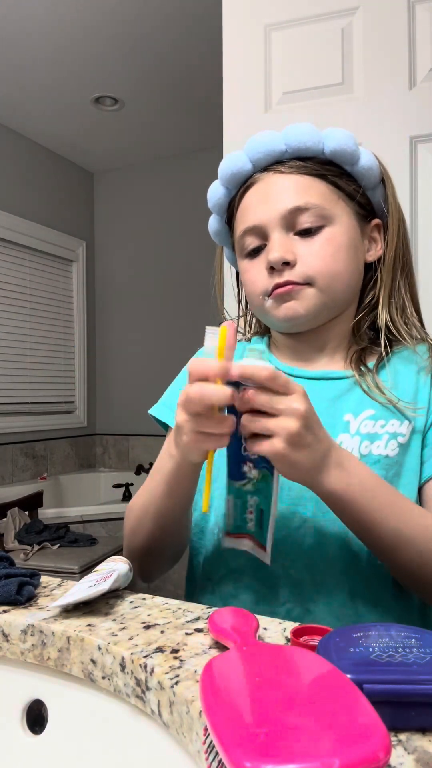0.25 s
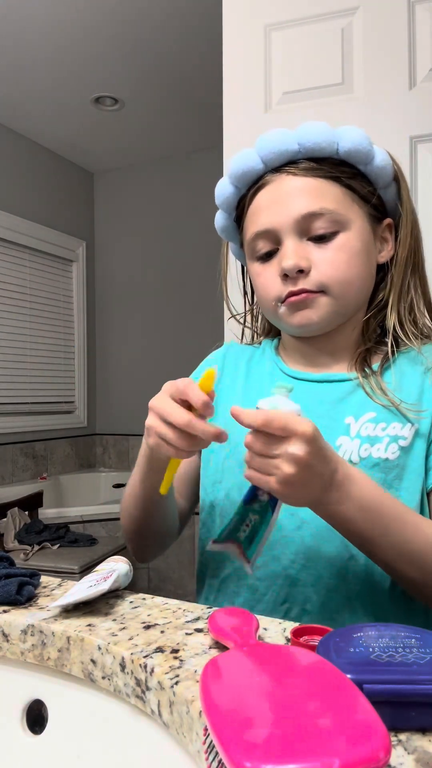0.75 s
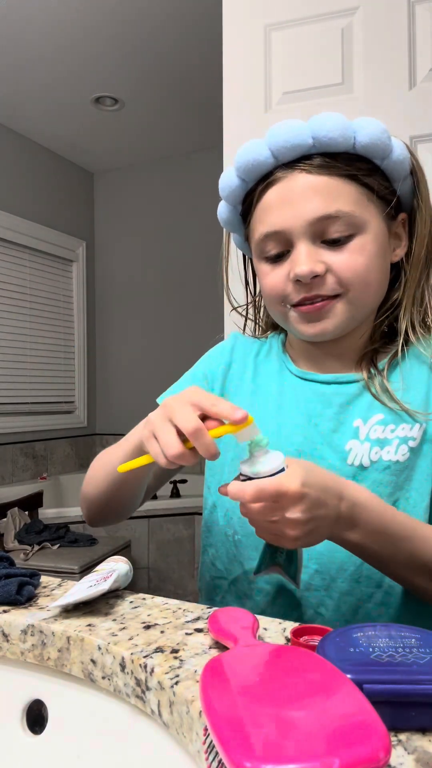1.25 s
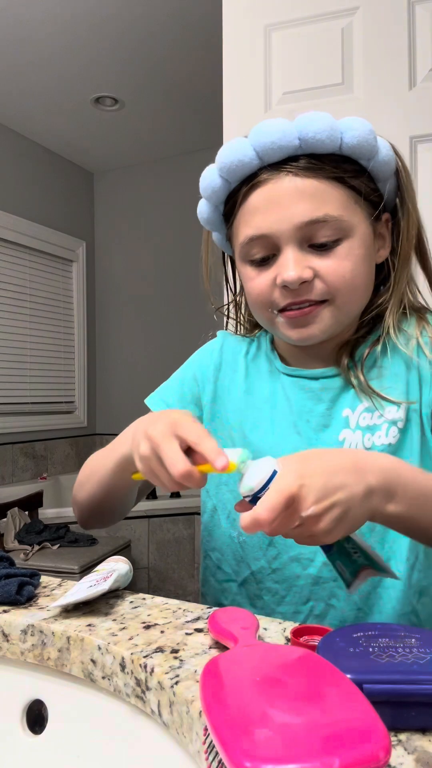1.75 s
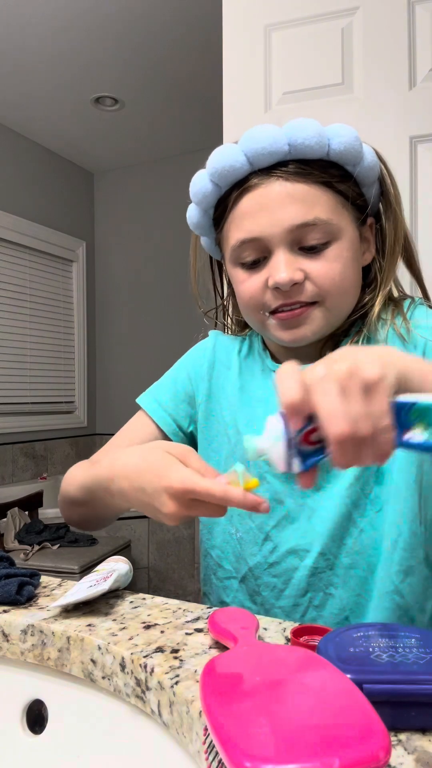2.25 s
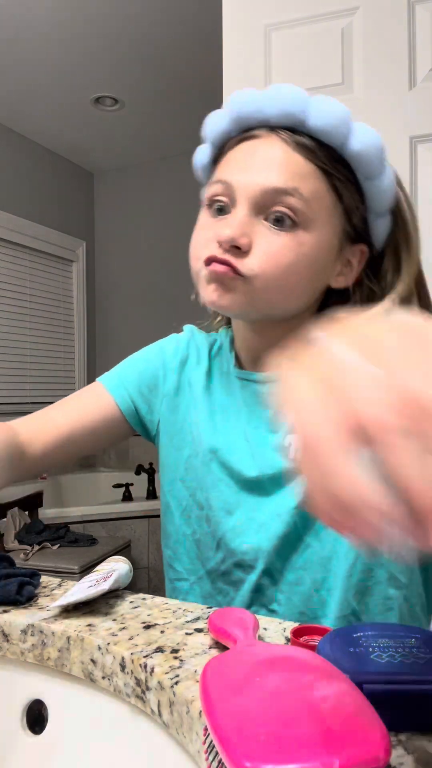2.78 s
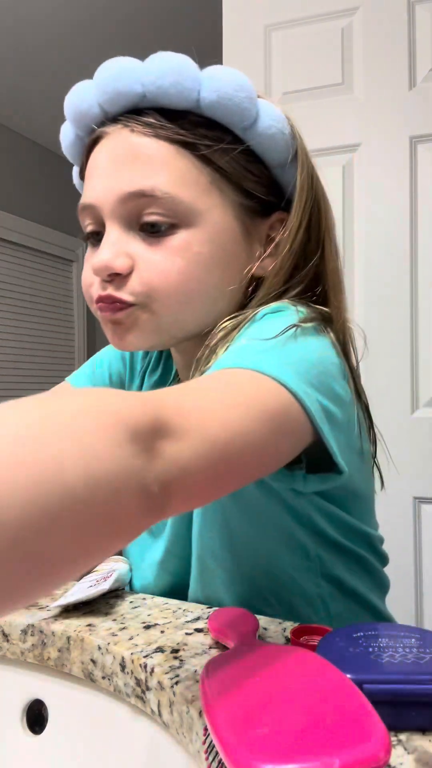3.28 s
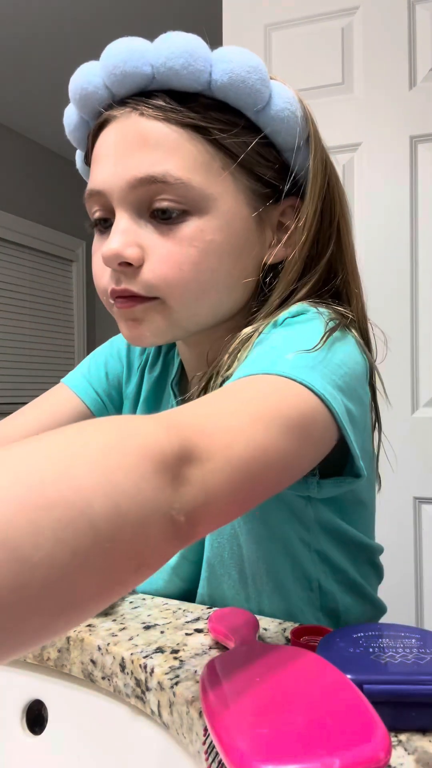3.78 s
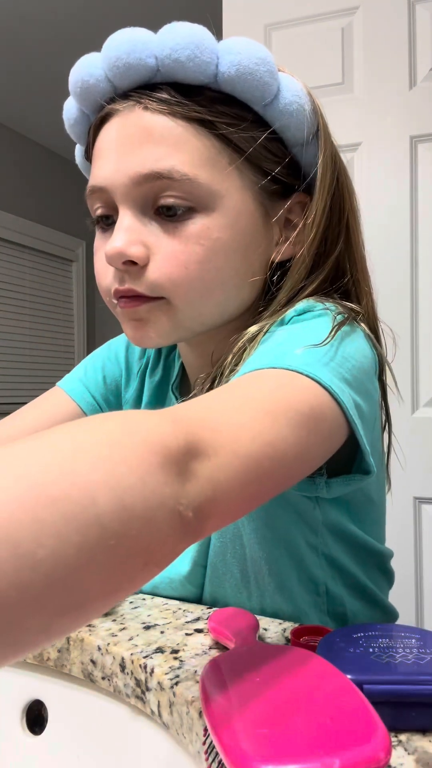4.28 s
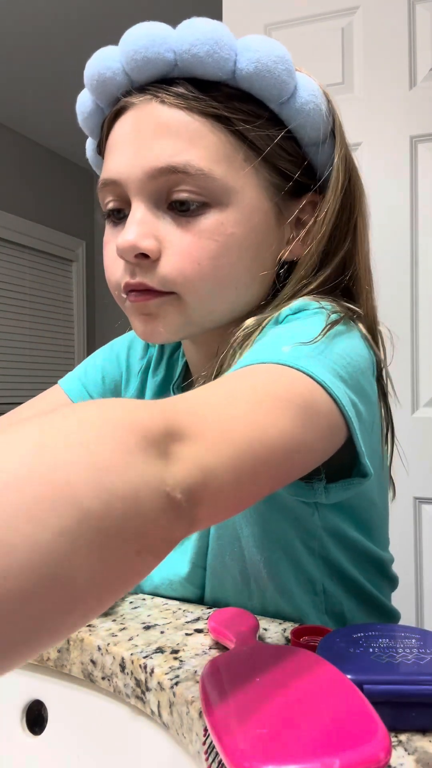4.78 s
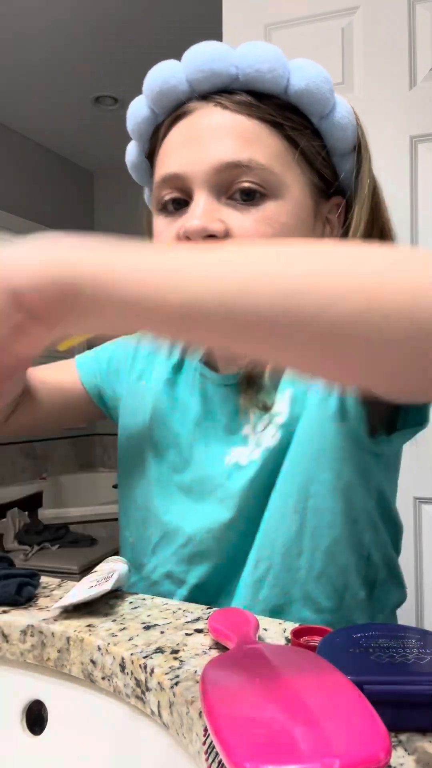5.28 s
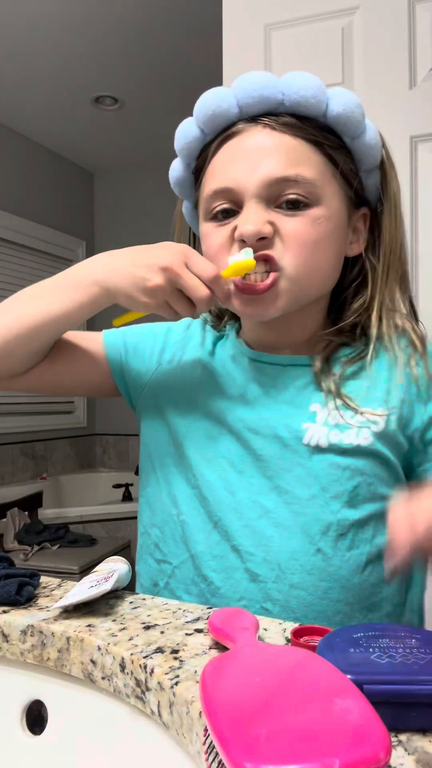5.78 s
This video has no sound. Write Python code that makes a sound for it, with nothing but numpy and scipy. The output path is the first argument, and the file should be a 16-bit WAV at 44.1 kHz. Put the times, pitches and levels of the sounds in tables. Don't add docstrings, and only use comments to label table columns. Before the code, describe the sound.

Faint rustles and ticks of a toothpaste tube, a sharp rattle on the counter, a second of spraying tap water, drips, toothbrush bristles.

```python
import sys
import numpy as np
from scipy import signal
from scipy.fft import rfft, irfft, next_fast_len
from scipy.io import wavfile

SR = 44100
rng = np.random.default_rng(int(sys.argv[2]) if len(sys.argv) > 2 else 0)


def master_out(mix):
    frames = np.transpose(np.atleast_2d(mix))
    ceiling = np.clip(frames, -1, 1)
    pcm = np.round(ceiling * 32767).astype(np.int16)
    wavfile.write(sys.argv[1], SR, pcm)


def linear_from_db(decibels):
    return 10 ** (np.asarray(decibels, float) / 20)


N = 265923

# pitch_hz, density_db_per_hz
AIR_COLOUR = [(21, -24.5), (35, 4), (109, -10), (168, -15), (204, -7), (263, -17), (284, -14), (362, -7),
              (540, -32.5), (700, -61), (1190, -120)]
# pitch_hz, width_hz, level_db
HUM_LINES = [(52.02, 11, -7.5), (120, 8, -11.5), (203.4, 5.4, -13.5), (309, 55, -12), (360.5, 1.6, -8.5),
             (480, 14, -20.5)]
# pitch_hz, density_db_per_hz
HISS_COLOUR = [(320, -38.5), (540, -3), (603, -4), (818, -8.5), (1190, -10), (2340, -20), (4500, -26.5),
               (8740, -32), (10200, -28), (13400, -30.5), (14500, -23)]
# pitch_hz, likeness (1 = same)
AIR_LIKENESS = [(60, .7), (200, .55), (350, .85), (1100, .2), (3000, .35), (6500, .65), (8000, .97),
                (9300, .45), (12000, .88), (14000, .55)]
# peak_s, added_db, rise_s, fall_s
SHAKES = [
    (2.62, 15.5, .14, .39),
    (4.05, -1.5, 0.46, 0.081),
]
# peak_s, added_db, rise_s, fall_s
STIRS = [
    (0.5, 6, 0.76, 0.98),
    (2.5, 19.5, 0.17, 1),
    (3.86, 7.5, 0.7, 0.2),
]

# start_s, hold_s, level_db
STROKES = [(0.0, 0.046, -73), (0.31, 0.061, -62), (0.375, .01, -68), (0.41, 0.055, -65),
           (0.63, 0.066, -68.5), (0.782, 0.0019, -73), (1.067, 0.0017, -66), (1.85, 0.1, -73),
           (2.29, 0.0039, -79), (3.036, 0.22, -67.5), (4.768, 0.028, -65), (4.82, 0.034, -60),
           (4.937, 0.16, -79), (5.597, 0.019, -75.5), (5.72, 0.13, -73), (5.861, 0.044, -77.5),
           (5.985, 0.068, -65)]
# pitch_hz, density_db_per_hz
RUB_COLOUR = [(2350, -7), (4000, -5.5), (7620, -10.5), (9570, -11), (10500, -38), (11900, -21), (13600, -3),
              (14600, -1.5)]
# start_s, hold_s, level_db
SPATTER = [
    (1.143, 0.017, -66.5),
    (1.452, 0.028, -71),
    (4.694, .02, -67),
    (4.765, .04, -54.5),
    (4.845, 0.03, -60),
    (4.905, 0.043, -61),
    (4.94, 0.066, -65.5),
]
# pitch_hz, density_db_per_hz
SPATTER_COLOUR = [(3500, -30), (5500, -19), (7200, -13), (8500, -4), (9600, -3), (10500, -37), (11800, -9),
                  (13500, -3), (14600, -15)]

# start_s, peak_db, ring_hz, top_edge_db
FINGER_TICKS = [(0.164, -69, 3400, -68), (0.211, -73, 6040, -74), (0.3692, -65.5, 6300, -76),
                (0.788, -60.5, 3330, -67), (1.047, -55, 4520, -55), (1.448, -63.5, 7900, -77),
                (1.4657, -55, 9300, -66), (1.7494, -77, 3530, -68), (1.9, -74, 3500, -69),
                (2.418, -67, 5200, -77.5)]
# start_s, peak_db, ring_hz, top_edge_db
DRIPS = [(3.804, -45.5, 3830, -39.5), (3.8893, -39, 8580, -38), (3.9493, -33.5, 9500, -48),
         (4.5146, -59, 8940, -60.5), (4.6285, -50.5, 5880, -60), (4.69, -76, 8130, -52),
         (4.7624, -30, 9700, -48), (4.771, -40, 8500, -54.5), (4.8235, -52, 8300, -57.5),
         (4.8424, -33, 7840, -40.5), (4.8697, -44, 7970, -65), (4.903, -32.5, 9000, -44.5),
         (4.913, -39.5, 7200, -60), (4.74, -59, 8730, -62), (5.076, -58, 7800, -59),
         (4.787, -59.5, 6200, -71), (4.946, -54.5, 3610, -65), (4.977, -58, 5500, -52.5),
         (4.989, -59, 7780, -62), (5.024, -65, 4950, -74), (5.0954, -75, 5160, -62.5),
         (5.2444, -77, 3965, -83), (5.861, -58.5, 7670, -63), (5.9692, -37, 6930, -55),
         (5.9723, -47, 7040, -58)]
# start_s, peak_db, ring_hz, left_right_db
TAPS = [(0.675, -57.5, 1890, -15), (.677, -50, 694, -5), (1.048, -52, 8100, -2), (1.049, -49.5, 875, -7),
        (1.054, -56, 2380, -18.5), (1.049, -61.5, 1720, -11), (1.055, -64, 4740, -17),
        (2.351, -41, 12800, -3), (2.425, -53, 5100, -14), (2.539, -40, 7800, -4), (2.6, -59, 1900, -9),
        (3.806, -44, 6000, -17), (3.889, -54, 3740, -15), (4.79, -46, 990, 2), (3.22, -62, 1190, -7),
        (4.771, -53.5, 5580, -20), (3.9512, -46, 2820, -2), (4.819, -59, 4190, -19),
        (4.822, -52.5, 2180, -8), (6, -51, 8800, 2), (5.841, -59, 1630, -16)]
# pitch_hz, left_right_db
TICK_BALANCE = [(3300, -20), (5200, -20.5), (7000, -11), (9200, -0.5)]

# start_s, crack_db, hollow_body_db, crack_hz, sizzle_db
RATTLE = [(2.304, -74.5, -71, 2523, -62.5), (2.342, -51, -73.5, 2886, -48.5),
          (2.443, -27.5, -44, 2185, -39), (2.453, -43.5, -55.5, 4000, -50), (2.593, -48, -28.5, 2500, -51),
          (2.623, -33, -35.5, 5200, -36), (2.6665, -40.5, -47, 3986, -39),
          (2.694, -37.5, -46.5, 4480, -39.5), (2.747, -36, -32, 2005, -45.5),
          (2.5681, -37, -33.5, 4895, -35), (2.5725, -17.5, -22.5, 3678, -20),
          (2.6013, -22, -5.5, 2177, -20.5), (2.6133, -22.5, -29.5, 3547, -21),
          (2.619, -22.5, -30.5, 3560, -33), (2.6589, -24, -46, 2733, -26.5),
          (2.684, -27, -34.5, 5484, -33.5), (2.7248, -29.5, -23, 3960, -25),
          (2.74, -23, -27.5, 2807, -34.5), (2.7639, -29.5, -32.5, 2410, -34.5),
          (2.8515, -23.5, -27, 3407, -42.5), (2.8626, -29.5, -37, 3430, -35), (2.884, -56, -35, 3687, -59),
          (3.034, -31, -33.5, 3224, -39), (3.0931, -44, -44.5, 2860, -70.5)]
# pitch_hz, level_db, t60_s
TUBE_MODES = [(660, -30.5, 0.0044), (870, -23, 0.015), (980, -13, 0.09), (1030, -8, 0.047),
              (1150, -1.5, 0.0085), (1210, 5.5, 0.024), (1440, 1.5, 0.011), (1610, -9.5, 0.0067),
              (1810, -5, 0.016)]

# start_s, boom_db, knock_db, knock_hz, boom_hz
THUDS = [(2.445, -21.5, -15.5, 505, 76.7), (2.57, -67, -31, 1090, 74.5), (2.607, -31, -22, 414, 70.5),
         (2.724, -38, -28, 412, 124), (2.908, -38.5, -56, 380, 77.2), (3.105, -39.5, -58.5, 387, 134.7),
         (3.241, -44, -64, 390, 76.8), (4.798, -33, -46, 540, 120), (4.814, -34.5, -36, 480, 135.8),
         (4.862, -37, -42, 390, 145.6)]
# share_of_boom_hz, level_db, t60_s
BOOM_MODES = [(1.0, 4, 0.17), (1.75, -8.5, 0.31), (2.2, -9.5, 0.25), (3.001, -23, 0.29), (4.0, -27, 0.23)]
# share_of_knock_hz, level_db, t60_s
KNOCK_MODES = [(.8, -6.5, 0.033), (1.0, 6, .03), (1.4, -7, 0.069), (1.9, 11.5, 0.0062), (2.8, -0.5, 0.011)]
# start_s, level_db, pitch_hz, t60_s
REBOUNDS = [(2.68, -35, 120, .2), (2.723, -36, 159, 0.22), (2.784, -38, 123.6, 0.29),
            (2.849, -45, 331, 0.076), (2.886, -37.5, 111, 0.11), (2.891, -35.5, 170, .1),
            (2.946, -44.5, 167, 0.11)]

# pitch_hz, likeness (1 = same)
TAP_LIKENESS = [(500, .2), (1100, .3), (1450, .7), (3000, .15), (6500, .75), (8000, .97), (9300, .7),
                (12000, .8), (14000, .85)]
# pitch_hz, density_db_per_hz
BASIN_COLOUR = [(290, -48), (500, -48), (653, -35), (703, -19), (909, -11.5), (1470, 3.5), (1790, -11),
                (2120, -12.5), (2700, -14.5), (3000, -15.5), (3400, -25), (4500, -37.5), (5850, -40),
                (9900, -120)]
# pitch_hz, density_db_per_hz
SPRAY_COLOUR = [(1940, -56), (3300, -48), (3730, -22), (4580, -19), (6300, -10), (7260, -12), (7920, -5),
                (9130, 3), (9470, 8), (10300, 6), (11500, -0.5), (13700, 0), (14500, -7)]
# pitch_hz, density_db_per_hz
MIST_COLOUR = [(13500, -15), (14400, -25), (15700, 5), (16200, -34)]
# start_s, end_s, from_hz, to_hz
WHISTLES = [(3.42, 4.6, 9150, 9100), (3.4, 4.2, 8150, 8200), (4.35, 4.6, 8200, 8150),
            (3.65, 4.2, 8540, 8540), (3.55, 4.05, 7500, 7680), (4.37, 4.6, 7680, 7680),
            (3.4, 4.25, 7000, 7000), (3.85, 4.55, 6800, 5950), (4.2, 4.6, 4850, 4850),
            (3.4, 3.8, 5300, 5300), (3.6, 4.0, 3800, 3800), (3.4, 4.0, 11700, 11800),
            (3.4, 3.6, 12300, 12300), (4.0, 4.6, 12200, 12200), (3.4, 3.9, 13100, 13100),
            (3.4, 4.05, 13480, 13500), (3.4, 4.6, 13830, 13850), (4.25, 4.6, 13400, 13400),
            (3.55, 4.4, 14600, 14650), (3.5, 4.1, 15050, 15000), (3.4, 4.6, 1430, 1450),
            (3.4, 4.6, 2130, 2130), (3.9, 4.55, 1000, 980), (4.25, 4.6, 600, 600)]
WHISTLE_DB = [-2, -8, -7, -4.5, -6.5, -11.5, -15, -13, -26, -40, -19, 0, -3.5, -24, -1, -3, -3, -13, -19,
              -18, -12.5, -14, -21, -20]
# pitch_hz, left_right_db
TAP_BALANCE = [(60, 0.0), (110, 0.0), (200, 0.5), (380, 15.5), (700, -3), (1290, 8.5), (2380, 6),
               (4400, -21), (8120, -0.5), (15000, 1)]

# time_s, pitch_hz, level_db
MOAN = [(3.66, 186.9, -68), (3.674, 189.3, -67), (3.722, 210, -51), (3.786, 184.4, -63), (3.83, 213, -44),
        (3.92, 208.2, -46), (4.02, 204.8, -64), (4.182, 202.4, -53.5), (4.22, 205.9, -78)]
# start_s, low_pipe_db, high_pipe_db
BUMPS = [(3.674, -40, -42), (3.712, -40, -42.5), (3.8, -40, -38), (3.844, -61, -48), (3.885, -42, -42),
         (3.926, -61, -44), (3.954, -61, -37), (4.021, -45, -42), (4.101, -47, -77.5)]
# pitch_hz, level_db, t60_s
LOW_PIPE_MODES = [(121, -7, 0.27), (178, -3, 0.21), (211, -3.5, 0.21)]
# pitch_hz, level_db, t60_s
HIGH_PIPE_MODES = [(330.8, -7, 0.19), (358, -8.5, 0.17)]
# pitch_hz, level_db, t60_s
HANDLE_MODES = [(565, 0, 0.036), (1000, -1.5, 0.039), (1257, -6.5, 0.029), (1460, 2.5, 0.029),
                (2067, -5, 0.025)]

# from_hz, to_hz, t60_s, level_db, unlike_share
ROOM = [(61, 455, 0.65, -24.5, .5), (540, 2700, 0.3, -24, .5), (1900, 2500, .35, -25.5, 1.3),
        (2500, 3600, 0.75, -23, 0.99), (3740, 5700, 0.51, -29, 1.1), (5200, 7200, 0.57, -26.5, 1.1),
        (7200, 8400, 0.49, -24.5, 0.34), (11150, 21000, 0.7, -28, .5)]
# pitch_hz, left_lead_radians
PORT_PHASE = [(0, -.4), (120, -1.1), (200, -1.8), (350, -1.0), (520, -1.3), (700, -2.0), (1100, -.4),
              (1450, .9), (3000, 1.7), (5000, 1.2), (7000, -.5), (8000, 0), (9150, 1.4), (10800, 4.2),
              (12000, 5.8), (13500, 7.1), (14800, 8.6), (17000, 9)]

TAP_OPEN_S, TAP_SHUT_S = 3.385, 4.57


def rms_one(x):
    return x / np.sqrt(np.mean(x ** 2) + 1e-20)


def in_time(rows):
    s, *columns = np.transpose(rows)
    return [np.interp(np.arange(N) / SR, s, column) for column in columns]


def at_hz(points, hz):
    point_hz, value = np.transpose(points)
    return np.interp(np.log(hz), np.log(point_hz), value)


def swells(rows):
    t = np.arange(N) / SR
    return sum(np.interp(t, [s - rise, s, s + fall], [0, db, 0]) for s, db, rise, fall in rows)


def plateau(start, end, db, rise_db_per_s, fall_db_per_s):
    t = np.arange(N) / SR
    return db - rise_db_per_s * np.maximum(start - t, 0) - fall_db_per_s * np.maximum(t - end, 0)


def drift(rate_hz):
    r = np.exp(-80 * np.pi * rate_hz / SR)
    white = rng.standard_normal(N // 40 + 2002)
    slow = signal.lfilter([1], [1, -2 * r, r * r], white)[2000:]
    return np.interp(np.arange(N) / 40, np.arange(len(slow)), rms_one(slow))


def add(track, s, sound):
    i = round(s * SR)
    track[..., i:i + sound.shape[-1]] += sound[..., :N - i]


def sides(pan_db):
    return linear_from_db([[pan_db / 2], [-pan_db / 2]])


def lean(x, db, radians):
    size = next_fast_len(N + 2000)
    hz = np.maximum(np.arange(size // 2 + 1) * SR / size, 1)
    half = linear_from_db(db(hz) / 2) * np.exp(.5j * radians(hz))
    return irfft(rfft(x, size) * [half, 1 / half], size)[:, :N]


def coloured(spectrum, likeness, lines=(), grit_db=0.0):
    size = next_fast_len(N)
    hz = np.maximum(np.arange(size // 2 + 1) * SR / size, 1)
    power = linear_from_db(2 * at_hz(spectrum, hz)) * (hz > spectrum[0][0] / 2) * (hz < spectrum[-1][0])
    power /= np.sum(power)
    for line_hz, width_hz, line_db in lines:
        shape = 1 / (1 + (2 * (hz - line_hz) / width_hz) ** 2) ** 2
        power += linear_from_db(2 * line_db) * shape / np.sum(shape)
    grains = linear_from_db(grit_db * np.minimum(rng.exponential(1, size), 3))
    white = rng.standard_normal((2, size)) * grains
    alike = np.clip(at_hz(likeness, hz), -1, 1)
    mid, side = rfft(white) * np.sqrt(power * [1 + alike, 1 - alike])
    return rms_one(irfft([mid + side, mid - side], size)[:, :N])


def snap(hz, q, fade_s, broad):
    t = np.arange(1500) / SR
    rise = 1 - np.exp(-t / 0.00045)
    fade = np.exp(-t / fade_s) + 0.15 * np.exp(-t / (2.0 * fade_s))
    burst = rng.standard_normal((2, 1500)) * [[1], [.25]] * rise * fade
    burst[0, 12] += 3.0
    bright = signal.lfilter([1, -.9], [1], burst)
    peak = signal.iirpeak(min(hz, 15000), max(q, .3), fs=SR)
    resonant = signal.lfilter(*peak, signal.lfilter(*peak, burst))
    mid, side = resonant + broad * bright
    return np.array([mid + side, mid - side]) / np.max(np.abs(mid))


def ring(push, hz, t60):
    r, w = linear_from_db(-60 / (t60 * SR)), 2 * np.pi * hz / SR
    return signal.lfilter([0, np.sin(w)], [1, -2 * r * np.cos(w), r * r], push + 1e-18)


def struck(modes, hardness_hz, scatter_db, length):
    push = np.hanning(max(int(SR / hardness_hz), 3))
    push = np.r_[push / push.sum(), np.zeros(length)]
    luck = linear_from_db(scatter_db * rng.standard_normal(len(modes)))
    sound = sum(k * linear_from_db(db) * ring(push, hz, t60) for k, (hz, db, t60) in zip(luck, modes))
    lowest_hz = min(mode[0] for mode in modes)
    sound = signal.sosfilt(signal.butter(3, .65 * lowest_hz, "high", fs=SR, output="sos"), sound)
    return sound / np.max(np.abs(sound))


def scaled(modes, base_hz):
    return [(share * base_hz, db, t60) for share, db, t60 in modes]


def air():
    before = (2.55, -56, -10.5, -80.5)   # time_s, hum_db, left_right_db, hiss_db
    after = (2.70, -52.5, -3.5, -80)
    hum_db, pan_db, hiss_db = in_time([before, after])
    hum_level = linear_from_db(hum_db + swells(SHAKES) + 0.44 * drift(1.7))
    hum = hum_level * coloured(AIR_COLOUR, AIR_LIKENESS, HUM_LINES)
    hiss_level = linear_from_db(hiss_db + swells(STIRS) + 6.0 + 0.76 * drift(10.0))
    hiss = hiss_level * coloured(HISS_COLOUR, AIR_LIKENESS)
    return linear_from_db([pan_db / 4, -pan_db / 4]) * (hum + hiss)


def friction(strokes, colour):
    level = sum(linear_from_db(plateau(s, s + hold, db, 904, 340)) for s, hold, db in strokes)
    return level * linear_from_db(-6.0 + 3.3 * drift(9.8)) * coloured(colour, TAP_LIKENESS, grit_db=7.5)


def rubbing():
    return friction(STROKES, RUB_COLOUR)


def ticks():
    out = np.zeros((2, N))
    for s, db, hz, edge_db in FINGER_TICKS + DRIPS:
        pan = sides(at_hz(TICK_BALANCE, hz))
        add(out, s, linear_from_db(db) * pan * snap(hz, q=5.4, fade_s=0.001, broad=0.0051))
        add(out, s, linear_from_db(edge_db + 9.0) * snap(18000, q=2.0, fade_s=0.0015, broad=0.013))
    for s, db, hz, pan_db in TAPS:
        add(out, s, linear_from_db(db) * sides(pan_db) * snap(hz, q=2.3, fade_s=0.0014, broad=0.0087))
    return out


def spatter():
    return friction(SPATTER, SPATTER_COLOUR)


def rattle():
    out = np.zeros((2, N))
    for s, crack_db, body_db, hz, sizzle_db in RATTLE:
        add(out, s, linear_from_db(crack_db) * sides(-15) * snap(hz, q=0.73, fade_s=0.002, broad=0.021))
        add(out, s, linear_from_db(sizzle_db + 11.5) * snap(9300, q=1.4, fade_s=0.0013, broad=0.25))
        add(out, s, linear_from_db(sizzle_db) * snap(16000, q=7.6, fade_s=0.00091, broad=.01))
        body = struck(TUBE_MODES, 1800, 2.4, length=3000)
        add(out, s + 0.00064, -linear_from_db(body_db + 2) * sides(1.5) * body)
    return out


def counter_knocks():
    out = np.zeros(N)
    for s, boom_db, knock_db, knock_hz, boom_hz in THUDS:
        boom = struck(scaled(BOOM_MODES, boom_hz), 350, 1.5, length=16000)
        knock = struck(scaled(KNOCK_MODES, knock_hz), 1.8 * knock_hz, 2.7, length=4000)
        add(out, s + .006, linear_from_db(boom_db) * boom)
        add(out, s, linear_from_db(knock_db) * knock)
    return out


def counter_rebounds():
    out = np.zeros(N)
    for s, db, hz, t60 in REBOUNDS:
        add(out, s, linear_from_db(db) * struck([(hz, 0, t60)], hz, 0, length=12000))
    return out


def whistles():
    out = np.zeros((2, N))
    t = np.arange(3 * SR, 5 * SR) / SR
    narrow = signal.butter(2, 60, fs=SR, output="sos")
    for (start, end, from_hz, to_hz), db in zip(WHISTLES, WHISTLE_DB):
        a, b, c, d = rms_one(signal.sosfilt(narrow, rng.standard_normal((4, len(t)))))
        turn = 2 * np.pi * np.cumsum(np.interp(t, [start, end], [from_hz, to_hz])) / SR
        mid = a * np.cos(turn) + b * np.sin(turn)
        side = 0.36 * (c * np.cos(turn) + d * np.sin(turn))
        fade_db = db - 150 * (np.maximum(start - t, 0) + np.maximum(t - end, 0))
        add(out, t[0], linear_from_db(fade_db) * np.array([mid + side, mid - side]))
    return out


def mirrored(x, share, lag_s, sway_s):
    lag = np.abs(lag_s + sway_s * drift(3.2)) * SR
    n = np.arange(N)
    return x + share * np.array([np.interp(n - lag, n, side) for side in x])


def tap():
    flow = linear_from_db(plateau(TAP_OPEN_S, TAP_SHUT_S, -59.5, 401.5, 211))
    basin = linear_from_db(1.04 * drift(31.0)) * coloured(BASIN_COLOUR, TAP_LIKENESS)
    spray_db = np.maximum(plateau(TAP_OPEN_S + .012, TAP_SHUT_S, 4, 700, 0), -15.0)
    spray = linear_from_db(spray_db + .5 * drift(11)) * coloured(SPRAY_COLOUR, TAP_LIKENESS, grit_db=4.5)
    mist_db = plateau(TAP_OPEN_S + 0.29, TAP_SHUT_S, 2.5, 83.5, 0)
    mist = linear_from_db(mist_db) * coloured(MIST_COLOUR, TAP_LIKENESS)
    water = basin + mirrored(spray + mist, 0.75, 0.0018, .00008) + whistles()
    return lean(flow * water, lambda hz: at_hz(TAP_BALANCE, hz), np.zeros_like)


def moan():
    hz, db = in_time(MOAN)
    sounding_db = plateau(MOAN[0][0], MOAN[-1][0], 3.0, 900, 900)
    return linear_from_db(db + sounding_db) * np.sin(2 * np.pi * np.cumsum(hz) / SR)


def pipe_bumps():
    out = np.zeros(N)
    for s, low_db, high_db in BUMPS:
        add(out, s, linear_from_db(low_db) * struck(LOW_PIPE_MODES, 440, 2.9, length=16000))
        add(out, s, linear_from_db(high_db) * struck(HIGH_PIPE_MODES, 277, 2.5, length=8000))
    return out


def handle():
    out = np.zeros(N)
    add(out, 4.7965, linear_from_db(-29) * struck(HANDLE_MODES, 1200, 0.95, length=4000))
    return out


def bathroom(x):
    t = np.arange(SR) / SR
    early = 1 + 2.0 * np.exp(-t / 0.0066)
    echoes = 0
    for low_hz, high_hz, t60, db, unlike in ROOM:
        white = rng.standard_normal(SR) + unlike * rng.standard_normal((2, SR))
        band = signal.sosfilt(signal.butter(2, [low_hz, high_hz], "band", fs=SR, output="sos"), white)
        echoes = echoes + linear_from_db(db - 17.0 - 60 * t / t60) * band * early
    return signal.fftconvolve(echoes * np.minimum(t / 0.0011, 1), x[None], axes=1)[:, :N]


def scene():
    clatter, small = rattle(), ticks()
    low = counter_knocks() + pipe_bumps() + handle()
    wet = bathroom(clatter.mean(axis=0) + linear_from_db(-0.5) * small.mean(axis=0) + low)
    hits = clatter + small + low * sides(-0.47) + wet
    return hits + air() + rubbing() + spatter() + tap() + moan() + counter_rebounds()


def centred_bass(x):
    low = signal.sosfiltfilt(signal.butter(4, 330, fs=SR, output="sos"), x)
    settled, = in_time([(3.0, 0), (3.1, 1)])
    return settled * low, x - settled * low


def band_limit(x):
    return signal.sosfilt(signal.butter(12, 17150, fs=SR, output="sos"), x)


def record(dry):
    centre, rest = centred_bass(dry)
    phase = lambda hz: np.interp(hz, *np.transpose(PORT_PHASE))
    spaced = centre.mean(axis=0) + lean(rest, np.zeros_like, phase)
    notch = signal.butter(3, (9650, 11000), "bandstop", fs=SR, output="sos")
    notched = signal.sosfilt(notch, spaced)
    low_cut = signal.butter(6, 48, "high", fs=SR, output="sos")
    high_cut = signal.butter(12, 16500, fs=SR, output="sos")
    mix = signal.sosfilt(np.r_[low_cut, high_cut], 0.13 * spaced + notched)
    return band_limit(mix)


dry = scene()
out = record(dry)
master_out(out)
```